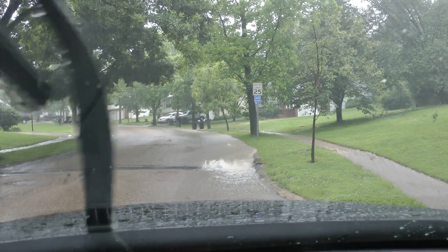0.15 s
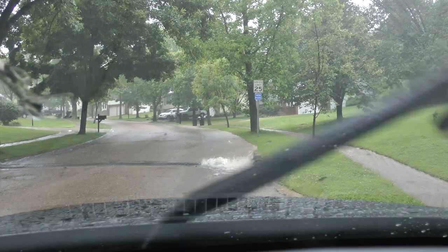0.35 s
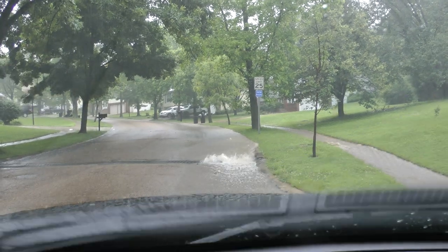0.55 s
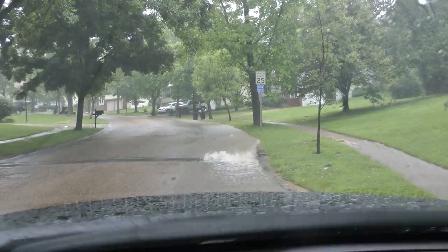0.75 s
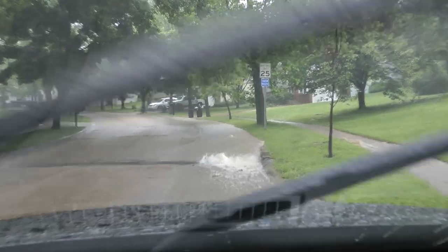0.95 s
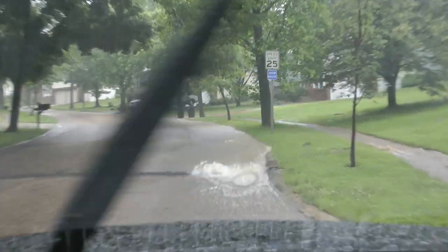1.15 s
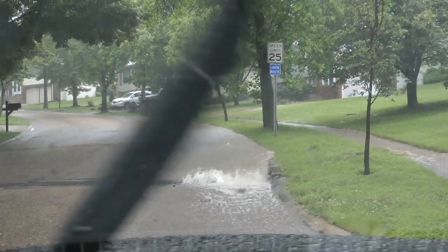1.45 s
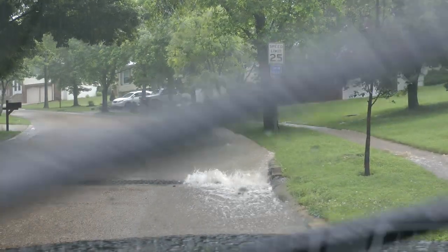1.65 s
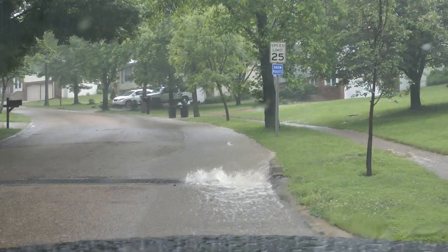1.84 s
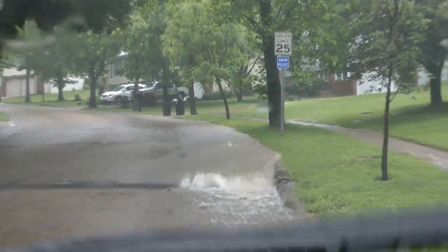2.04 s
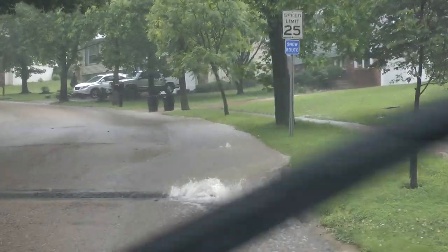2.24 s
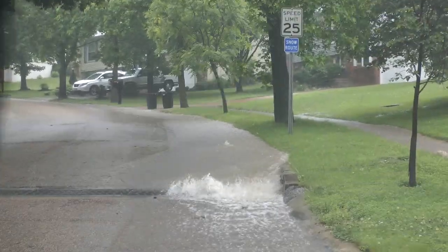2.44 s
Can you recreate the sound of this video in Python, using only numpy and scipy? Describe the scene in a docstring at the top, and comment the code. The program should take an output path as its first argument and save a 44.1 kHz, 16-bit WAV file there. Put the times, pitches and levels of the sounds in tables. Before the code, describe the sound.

Rain pattering on a car roof and windscreen, heard inside, with wipers thumping steadily.

```python
"""Rain on a car over a low road rumble, heard from the front seat, rolling slowly along a flooded street.
Fine rain hisses; heavy drops splat dully on the roof and tick sharply on the windscreen.
The wipers swing to and fro: at each turn the rubber judders and the arms thump.
Brief pings sound: a few ringing drops and one tiny, very high pip. The wet tyre roar slowly grows."""
import sys
import numpy as np
from scipy import signal
from scipy.fft import rfft, irfft
from scipy.io import wavfile
from scipy.ndimage import uniform_filter1d

SR = 44100
rng = np.random.default_rng(int(sys.argv[2]) if len(sys.argv) > 2 else 0)


def wav_out(sig):
    """Save sig, one row per channel (or a flat mono array), as 16-bit PCM at SR to the path in sys.argv[1]."""
    wavfile.write(sys.argv[1], SR, np.round(np.clip(np.atleast_2d(sig).T, -1, 1) * 32767).astype(np.int16))


N = 114219

# spectrum of windscreen ticks and roof spray: freq_hz, level_db
GLASS_SPECTRUM = [(100, -4), (700, -9), (1200, -14), (2000, 0), (4300, 2), (6000, 0), (8500, -8.5),
                  (11500, -22.5), (16000, -25.5)]
ATTACK_S = 0.00082


def amp(db):
    """Decibels to gain."""
    return 10 ** (np.asarray(db) / 20)


def unit_rms(x):
    """Scale to an rms of one."""
    return x / np.sqrt(np.mean(x ** 2) + 1e-20)


def curve(points, hz):
    """Interpolate over log frequency."""
    freq_hz, value = np.transpose(points)
    return np.interp(np.log(hz + 1), np.log(freq_hz + 1), value)


def add(mix, start_s, sound):
    """Mix in a stereo sound at start_s."""
    part = mix[:, max(round(start_s * SR), 0):][:, :sound.shape[1]]
    part += sound[:, :part.shape[1]]


def pan(db):
    """Stereo gains for a left-minus-right level."""
    return unit_rms(amp(np.array([[.5], [-.5]]) * db))


def noise(size=N):
    """Stereo white noise."""
    return rng.standard_normal((2, size))


def impulse(db):
    """Unit-energy minimum-phase response of a spectrum."""
    log_gain = np.log(amp(np.r_[db, db[-2:0:-1]]))
    response = np.fft.ifft(np.exp(signal.hilbert(log_gain).conj())).real
    return response / np.linalg.norm(response)


def convolve(x, response):
    """Filter each channel."""
    return signal.fftconvolve(x, np.atleast_2d(response), axes=1)[:, :N]


def reflections(decay_s, size=6000):
    """Decaying stereo noise, about unit energy per channel."""
    burst = noise(size) * np.exp(-np.arange(size) / SR / decay_s)
    return burst / np.linalg.norm(burst[0])


def cabin(x, spectrum, size=4096):
    """Colour two unrelated channels and blend them into the cabin's diffuse field."""
    # channel likeness: freq_hz, coherence
    likeness = [(50, 0.4), (150, 1.05), (350, 0.7), (1000, 0.62), (2500, 0.81), (6000, 0.88), (10000, 0.5)]
    # channel balance: freq_hz, left_minus_right_db
    balance = [(25, -1.5), (100, 7), (300, 2.5), (700, 1), (2000, -1.3), (6000, -1.3), (14000, 7.5)]
    colour = impulse(curve(spectrum, np.fft.rfftfreq(size, 1 / SR)))
    left, other = rfft(convolve(x, colour))
    hz = np.fft.rfftfreq(N, 1 / SR)
    coherence = np.clip(curve(likeness, hz), 0, 1)
    right = coherence * left + np.sqrt(1 - coherence ** 2) * other
    tilt = amp(curve(balance, hz) / 2)
    return irfft([left * tilt, right / tilt], N)


def road():
    """Road and engine rumble; wet tyre roar grows as the car rolls on."""
    # road and engine spectrum: freq_hz, level_db
    rumble_spectrum = [(10, -22), (22, 2), (32, -2), (55, -8.5), (80, -6), (130, -3.5), (200, 2),
                       (350, -3.5), (600, -14), (1500, -32.5), (8000, -73)]
    # wet tyre spectrum: freq_hz, level_db
    tyre_spectrum = [(200, -18), (550, -6.5), (800, 3.5), (950, -8), (1400, -12.5), (3000, -35.5)]
    rise_db_per_s = 3
    roar = amp(-60 + rise_db_per_s * np.arange(N) / SR) * cabin(noise(), tyre_spectrum)
    return amp(-45.5) * cabin(noise(), rumble_spectrum) + roar


def rain_wash():
    """Fine rain and running water blur into a fluttering hiss."""
    # fine rain spectrum: freq_hz, level_db
    wash_spectrum = [(100, -5), (300, -3), (810, 2), (900, -9.5), (1450, 2.5), (1550, -3), (1750, 7),
                     (2300, 4), (3500, 2.5), (6000, -6.5), (8500, -19.5), (11500, -23.5), (16000, -29)]
    flutter_db = 1.5 * unit_rms(uniform_filter1d(rng.standard_normal(N), size=500))
    return amp(-46) * cabin(unit_rms(amp(flutter_db)) * noise(), wash_spectrum)


def splat_power(level_db, length_s, fall_s=0.0056, size=4000):
    """Power of a drop spreading on the roof: rise, hold, release."""
    t = np.arange(size)[None] / SR
    rise = np.minimum(t / ATTACK_S, 1)
    release = np.exp(-np.maximum(t - length_s, 0) / fall_s)
    return (amp(level_db) * rise * release) ** 2


def panel_ring(detune=.03, size=6000):
    """Roof modes struck by one drop; pitch and phase vary with where it lands."""
    # roof panel modes: pitch_hz, relative_db, t60_s
    modes = [(419, 4.5, 0.081), (578, 6, 0.055), (747, 3, 0.14), (809.6, -4.5, 0.15), (1060, -1, 0.053),
             (1452, -6.5, 0.12)]
    t = np.arange(size) / SR
    ring = np.zeros(size)
    for pitch_hz, relative_db, t60_s in modes:
        cycles = pitch_hz * (1 + detune * rng.uniform(-1, 1)) * t + rng.random()
        ring += amp(relative_db - 60 * t / t60_s) * np.sin(2 * np.pi * cycles)
    return amp(-1.5) * ring / np.linalg.norm(ring)


def roof_splats(small_per_s=44, small_length_s=0.022, full_spray_s=0.024):
    """Grainy splats pass the headlining, ring the panel and echo; long ones throw bright spray."""
    # heavy roof drops: start_s, level_db, length_s, boom_relative_db
    heavy_drops = [(0.058, -42, 0.02, -23), (0.116, -42, 0.027, -19), (0.157, -37, 0.019, -26),
                   (.204, -39.5, 0.026, -13), (0.242, -33.5, 0.0062, 0), (.272, -36.5, 0.0086, 0.5),
                   (0.293, -35, 0.014, -3), (0.352, -34, 0.008, -1.5), (0.418, -35.5, 0.0049, -4.5),
                   (0.461, -43.5, 0.0077, -17), (0.591, -39, 0.017, -9), (0.645, -41, 0.014, -29),
                   (0.704, -38.5, 0.0072, 2.5), (0.774, -32.5, 0.0043, -3.5), (0.805, -36, 0.008, -8),
                   (0.848, -30.5, 0.0097, -4), (1.087, -41.5, 0.032, -13), (1.13, -39.5, 0.015, -4),
                   (1.176, -41, 0.018, -10), (1.235, -35.5, 0.015, -6), (1.263, -37.5, 0.01, -18),
                   (1.288, -36.5, 0.01, -28), (1.408, -42.5, 0.023, -24), (1.524, -37, 0.0097, -9),
                   (1.578, -36, 0.015, -1), (1.634, -38.5, 0.01, -17), (1.712, -31.5, 0.024, -8),
                   (1.742, -39, 0.024, -10), (1.848, -35, 0.016, -5.5), (1.877, -37.5, 0.014, -1.5),
                   (1.911, -37.5, 0.0095, 2.5), (2.068, -33.5, 0.0078, -1), (2.13, -31.5, 0.01, -1),
                   (2.279, -34, 0.0059, -1.5), (2.343, -34, 0.0051, -4), (2.371, -36.5, 0.0068, 1),
                   (2.487, -36, 0.0094, -6), (2.521, -36.5, 0.0052, 0), (2.562, -35, 0.0089, -1)]
    # splat spectrum through the headlining: freq_hz, level_db
    roof_spectrum = [(60, -22), (200, -2.5), (450, -3), (810, 1.5), (900, -15.5), (1450, -3.5),
                     (1550, -12.5), (1750, 0.5), (2300, 1.5), (3300, 1), (4500, -5.5), (6200, -11.5),
                     (8500, -20.5), (11500, -26.5), (16000, -28)]
    small_drops = [(rng.uniform(0, N / SR), -49 + rng.uniform(-5.5, 5.5), small_length_s, -1.5)
                   for _ in range(round(small_per_s * N / SR))]
    power, spray_power, boom = np.zeros((3, 2, N))
    for start_s, level_db, length_s, boom_db in [*heavy_drops, *small_drops]:
        add(power, start_s, splat_power(level_db - 1, length_s))
        spray_share = min(length_s / full_spray_s, 1) ** 2
        add(spray_power, start_s, spray_share * splat_power(level_db - 12, length_s))
        push = np.sqrt(splat_power(level_db + boom_db, length_s))
        add(boom, start_s, convolve(push * noise(push.size), panel_ring()))
    flicker = unit_rms(uniform_filter1d(rng.standard_normal(N), size=30))
    grain = unit_rms(np.exp(0.78 * np.tanh(flicker)))
    splats = np.sqrt(power) * grain * noise()
    spray = cabin(np.sqrt(spray_power) * grain * noise(), GLASS_SPECTRUM)
    echo = amp(-8) * convolve(splats, reflections(decay_s=0.015))
    flat_spectrum = [(1, 0), (SR, 0)]
    return cabin(splats + echo, roof_spectrum) + spray + cabin(boom, flat_spectrum)


def glass_tick(level_db, bright_db, pan_db, size=512):
    """A drop snaps on the glass; a dashboard reflection and a short rattle follow."""
    shelf_hz, spread_s, dashboard_s, click_s = 5400, 0.00088, .0034, .0004
    hz = np.fft.rfftfreq(size, 1 / SR)
    shelf_db = (bright_db + 8) * (1 - 1 / (1 + (hz / shelf_hz) ** 6))
    click = impulse(curve(GLASS_SPECTRUM, hz) + shelf_db)
    delay_s = spread_s / np.sqrt(1 + hz / 1000)  # treble travels fastest in glass
    click = irfft(rfft(click) * np.exp(-2j * np.pi * np.cumsum(delay_s) * hz[1]))
    # faint or dull drops land farther off: less snap, more rattle
    far_db = max(-21 - level_db, -20 - bright_db)
    soften_db = np.clip(.6 * far_db, 0, 4)
    mid, side = reflections(decay_s=.004, size=1500)
    path = amp(-7.5 + soften_db) * np.array([mid + .3 * side, mid - .3 * side])
    path[:, :1] += pan(pan_db) * amp(-soften_db)
    path[:, round(dashboard_s * SR)] += amp(-14)
    return amp(level_db - 2.5) * np.sqrt(click_s * SR) * convolve(path, click)


def windscreen(small_per_s=100):
    """Large drops and a random sprinkle of small ones hit the glass."""
    # large windscreen drops: start_s, level_db, bright_db, pan_db
    large_drops = [(.069, -26, -15, 7), (0.1599, -24, -12, -4), (0.2744, -22, -16, -1),
                   (0.4163, -19, -39, -7), (0.4517, -24.5, -27, -2), (0.4674, -18.5, -20, -5),
                   (.649, -23.5, -17, 0), (0.7024, -25.5, -21, -4), (0.7273, -24.5, -18, -6),
                   (0.7471, -23, -9, -2), (0.8491, -24, -3, -2), (1.003, -24, -40, -3),
                   (1.0231, -25, -26, -1), (1.3145, -25, -16, -2), (1.3606, -23.5, -10, 4),
                   (1.5266, -19.5, -29, -8), (1.5571, -17.5, -37, -7), (1.6239, -22, -14, 5),
                   (1.8383, -15, -10.5, -2), (1.8473, -22.5, -13, -10), (1.8983, -23, -7, -1),
                   (2.0032, -22, -9, 2), (2.045, -16.5, -18, -3.5), (2.1622, -22, -17, -3),
                   (2.2819, -24.5, -20, -2), (2.3092, -17.5, -14, -3.5), (2.3216, -23, -20, -5),
                   (2.3723, -23, -8, 3)]
    out = np.zeros((2, N))
    for start_s, *drop in large_drops:
        add(out, start_s, glass_tick(*drop))
    for strength, bright, side in rng.standard_normal((round(small_per_s * N / SR), 3)):
        level_db = -35.5 + 2.6 * min(strength, 2)
        tick = glass_tick(level_db, bright_db=-7 + 4 * bright, pan_db=side - 1)
        add(out, rng.uniform(0, N / SR), tick)
    return out


def wipers():
    """Blades drag and catch as they slow, judder as they flip; arms thump, sink in pitch and ring on."""
    # wiper turns: turn_s, judder_db, judder_width_s, thump_db, thump_hz, ring_db
    turns = [(0.232, -32, 0.03, -38, 215, -41), (0.833, -33.5, 0.037, -28, 118, -48),
             (1.434, -32.5, 0.028, -31.5, 205.3, -37.5), (2.038, -33.5, 0.044, -28, 130, -55),
             (2.595, -36.5, 0.026, -29, 204, -48)]
    # rubber on glass spectrum: freq_hz, level_db
    rubber_spectrum = [(20, -29), (55, -5.5), (85, -6), (130, -0.5), (190, -2), (320, -0.5), (450, -11.5),
                       (800, -27), (1500, -65)]
    rise_s, fall_s, sag_per_s = 0.018, .012, 9
    ring_hz, ring_peak_s = 187, 0.059
    rub_power, arms = np.zeros((2, N))
    for turn_s, judder_db, judder_width_s, thump_db, thump_hz, ring_db in turns:
        t = np.arange(N) / SR - turn_s
        judder, drag, catch = (0, 0, judder_width_s), (-16.5, 0, 0.2), (-6, 0.068, 0.016)
        for relative_db, lead_s, width_s in (judder, drag, catch):
            rub_power += amp(judder_db + relative_db) ** 2 * np.exp(-((t + lead_s) / width_s) ** 2)
        pitch_hz = thump_hz * np.exp(-sag_per_s * np.clip(t, -2 * rise_s, fall_s))
        cycles = np.cumsum(pitch_hz) / SR + rng.random()
        swell = np.exp(-(t / np.where(t < 0, rise_s, fall_s)) ** 2 / 2)
        arms += amp(thump_db) * swell * np.sin(2 * np.pi * cycles)
        age = np.maximum(t, 0) / ring_peak_s
        ring = np.sin(2 * np.pi * (ring_hz * t + rng.random()))
        arms += amp(ring_db) * age ** 2 * np.exp(1 - age ** 2) * ring
    return cabin(np.sqrt(rub_power) * noise(), rubber_spectrum) + arms * pan(db=5.5)


def pings(t60_cycles=143, size=6000):
    """Brief pings: a few ringing drops and one tiny, very high pip."""
    # brief pings: start_s, pitch_hz, level_db
    tones = [(0.778, 3090, -34), (0.849, 3120, -26.5), (1.23, 12500, -36), (1.527, 3140, -28.5),
             (1.911, 3035, -30.5), (2.132, 2304, -30)]
    out, t = np.zeros((2, N)), np.arange(size) / SR
    for start_s, pitch_hz, level_db in tones:
        cycles = pitch_hz * t
        envelope = amp(level_db - 60 * cycles / t60_cycles) * np.minimum(t / ATTACK_S, 1)
        add(out, start_s, envelope * np.sin(2 * np.pi * cycles) * pan(db=-4.5))
    return out


def scene():
    """Everything heard in the cabin."""
    return road() + rain_wash() + roof_splats() + windscreen() + wipers() + pings()


def record(dry):
    """Brief silence, quick fade-in, steep low-pass."""
    silence_s, fade_s, cutoff_hz = 0.044, 0.0083, 16000
    fade = np.clip((np.arange(N) / SR - silence_s) / fade_s, 0, 1)
    lowpass = signal.firwin(511, cutoff_hz, window=("kaiser", 9), fs=SR)
    return signal.oaconvolve(dry * fade, lowpass[None], "same")


dry = scene()
out = record(dry)
wav_out(out)
```